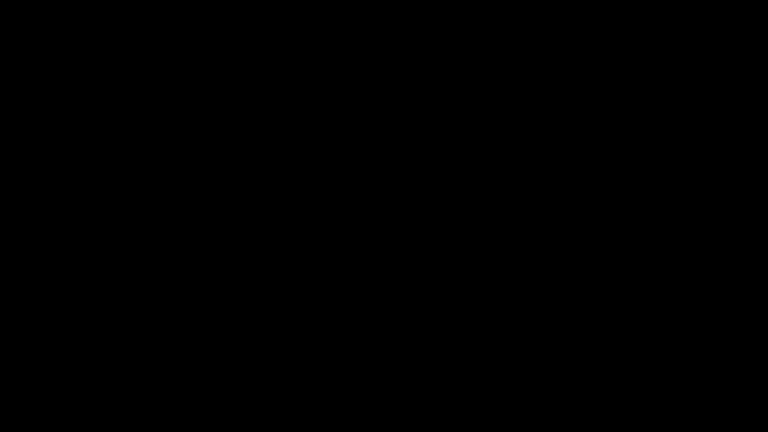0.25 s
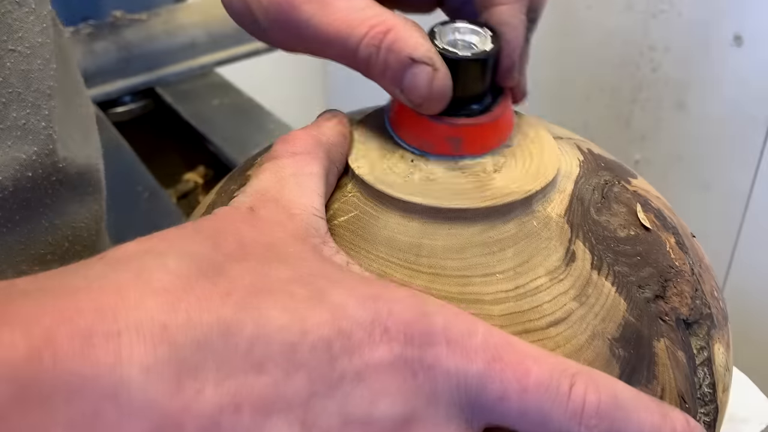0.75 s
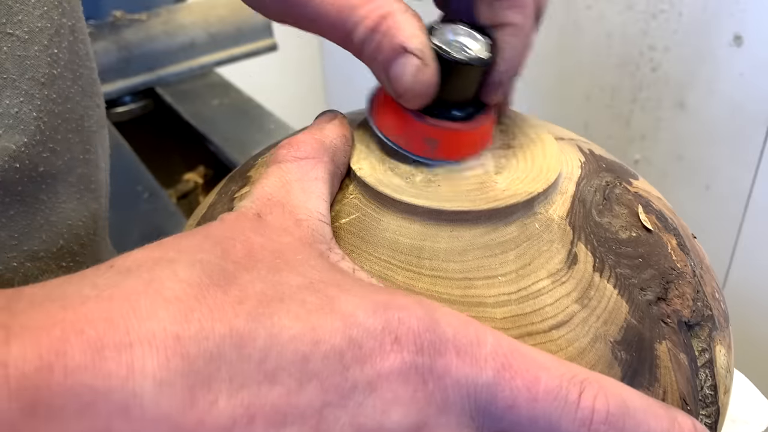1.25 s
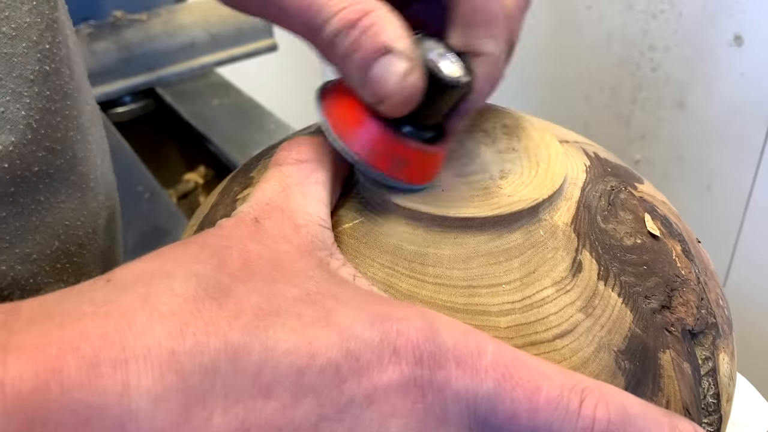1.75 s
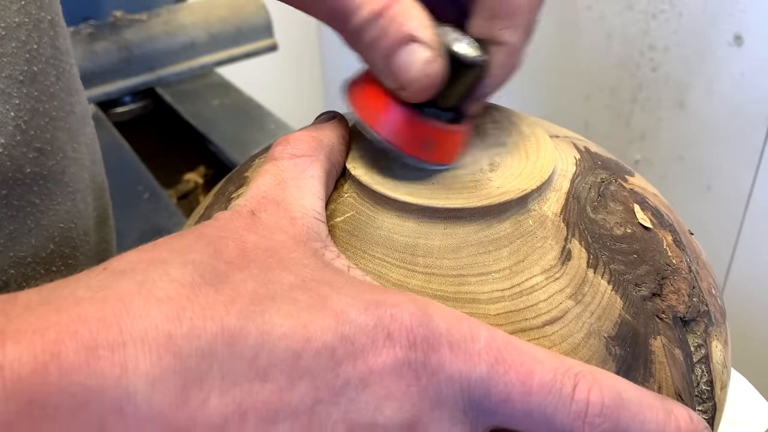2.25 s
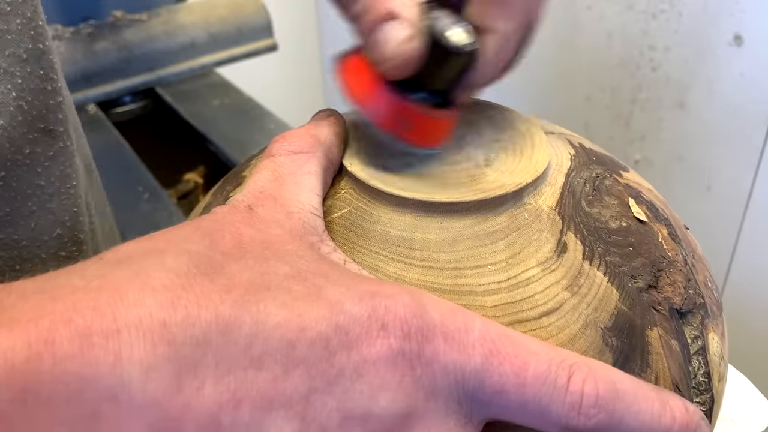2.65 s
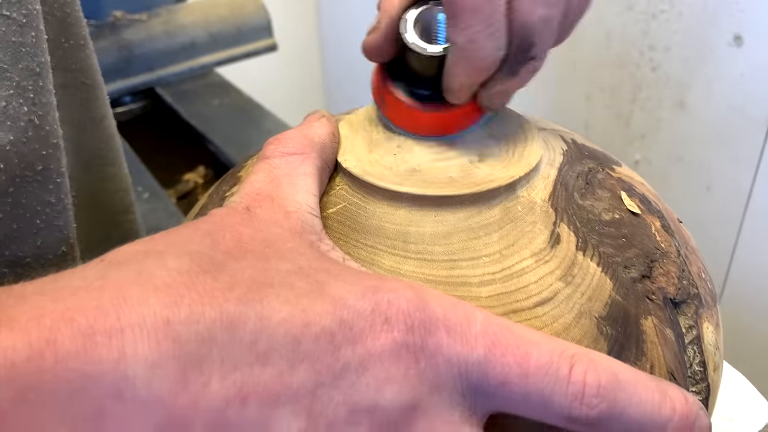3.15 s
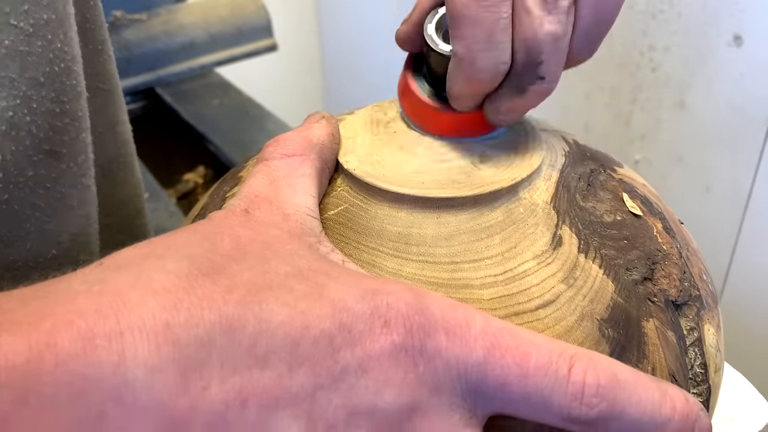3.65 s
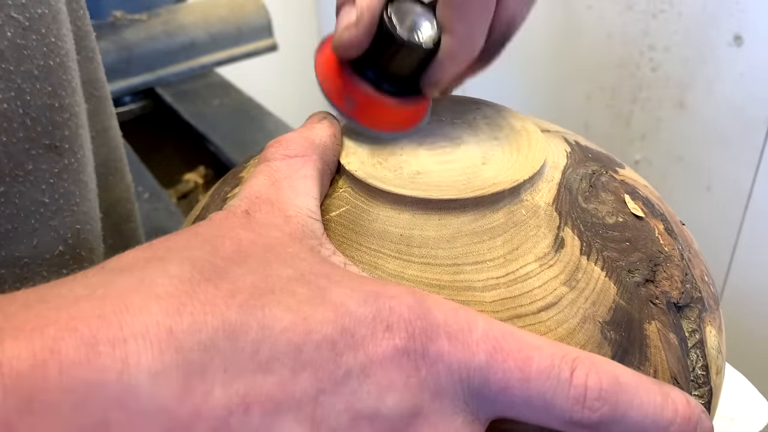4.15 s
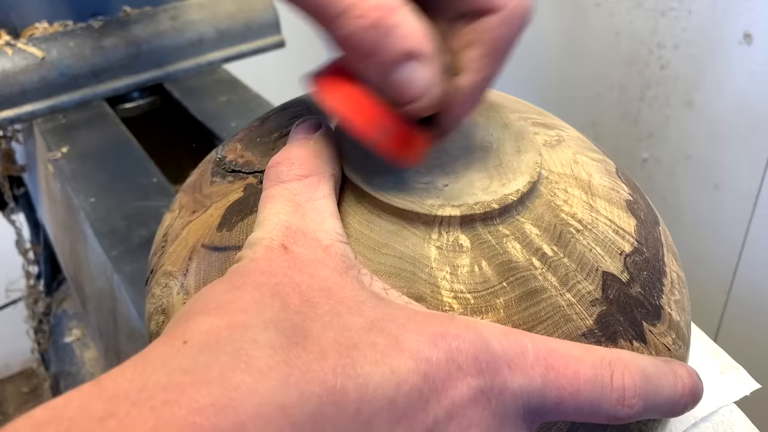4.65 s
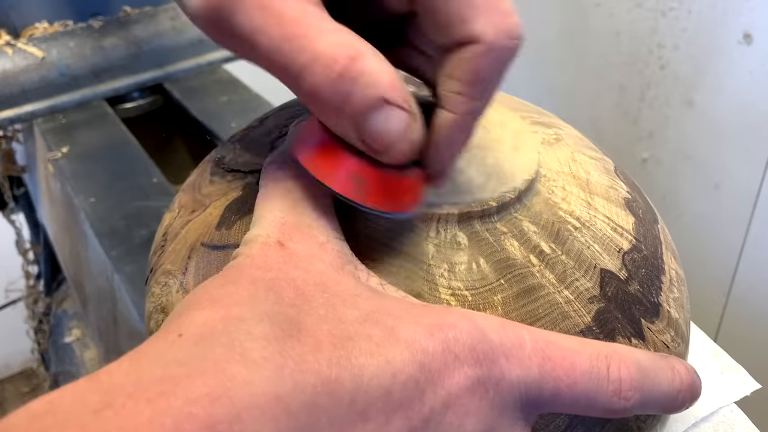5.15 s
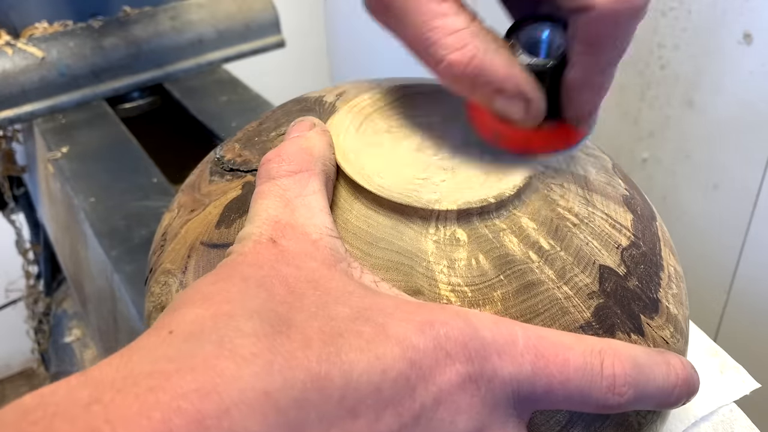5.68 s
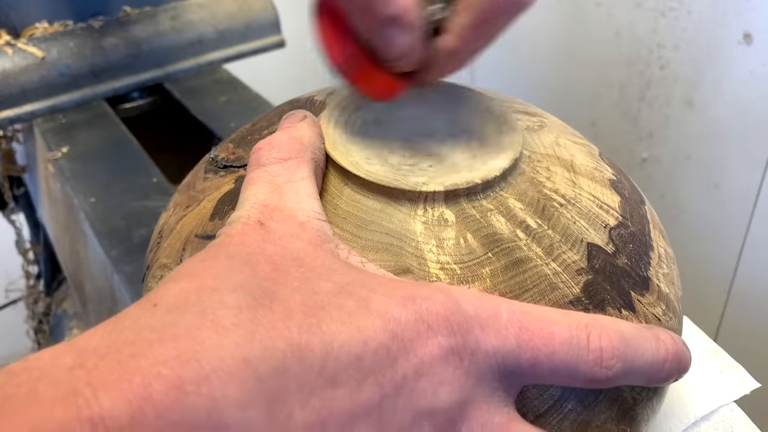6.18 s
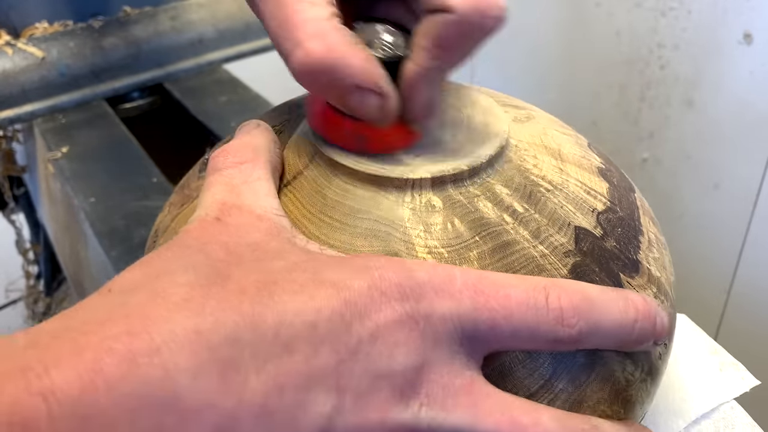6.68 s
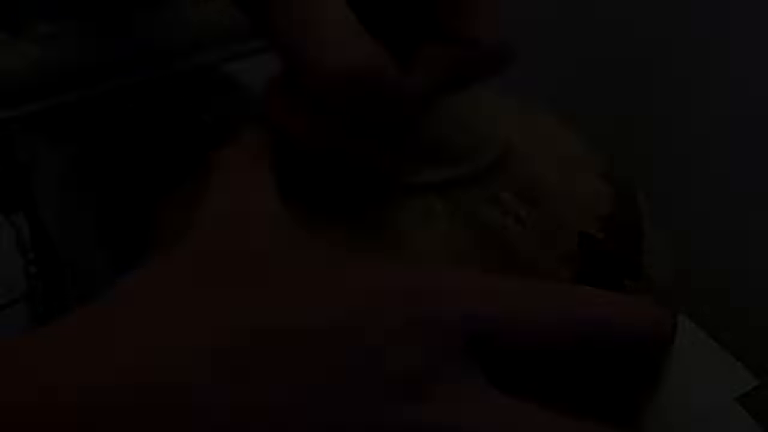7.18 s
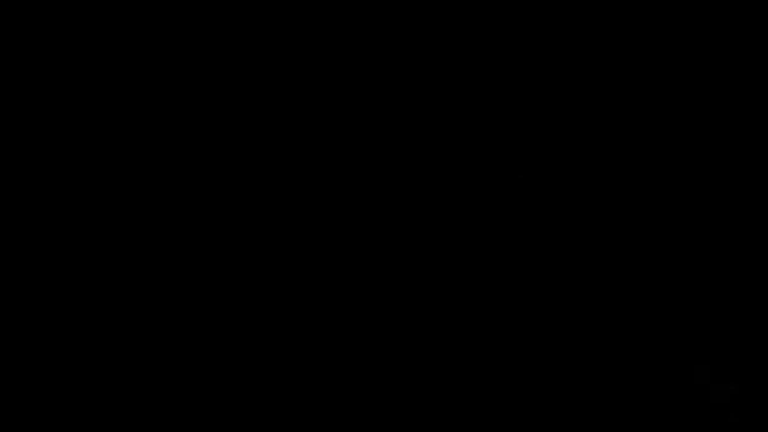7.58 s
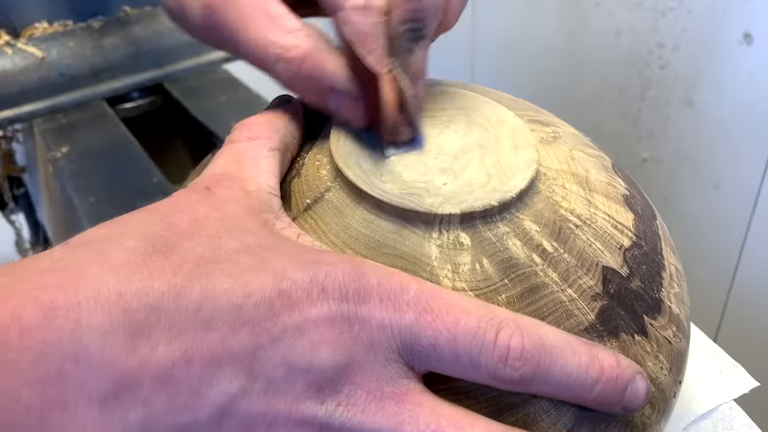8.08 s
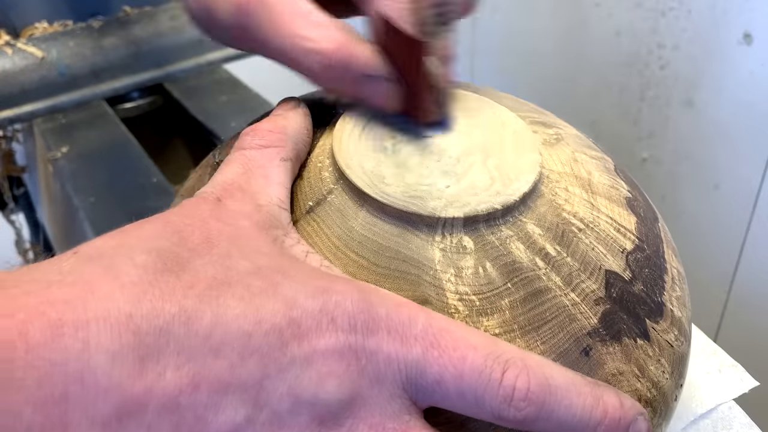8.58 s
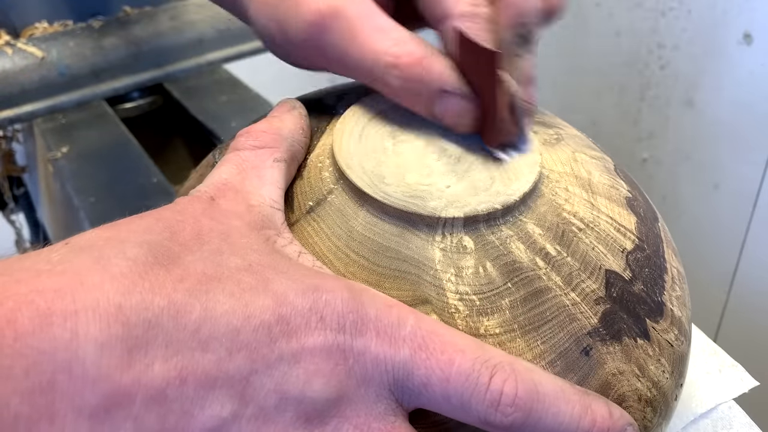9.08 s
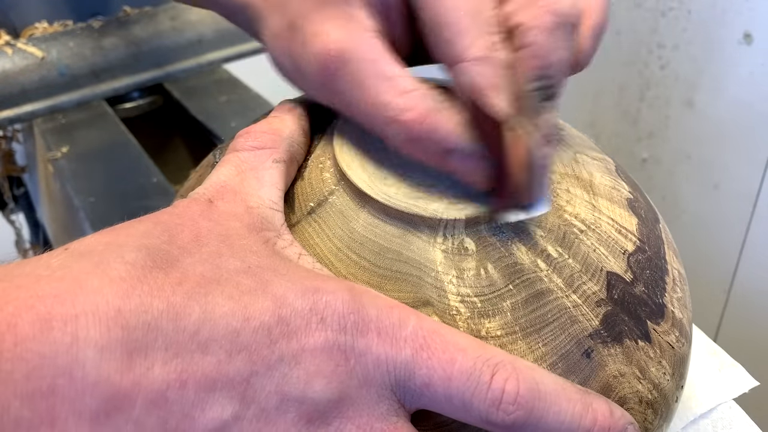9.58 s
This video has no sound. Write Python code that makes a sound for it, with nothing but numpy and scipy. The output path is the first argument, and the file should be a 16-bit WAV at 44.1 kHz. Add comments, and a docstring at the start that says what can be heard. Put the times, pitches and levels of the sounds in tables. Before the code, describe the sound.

Close, dry hand sanding on a wooden bowl: a fading motor whine, rapid gritty pad scrubs with soft thuds, then slower, brighter sheet strokes.

```python
"""A quiet workshop, heard up close: a low rumble, a faint room tone, and a small power sander that whines and fades.
A foam pad with sandpaper scrubs a hollow wooden bowl in short strokes; later a folded sheet rubs it in long ones.
The sander adds sine waves to a rush of noise. Every rub is noise shaped by the grit, pad, sheet or wood.
The other hand turns the bowl with a soft brushing, and the bowl thuds as it rocks on the bench.
Two microphone ports hear it out of step."""
import sys
import numpy as np
from scipy import signal
from scipy.fft import rfft, irfft, next_fast_len
from scipy.io import wavfile
from scipy.ndimage import uniform_filter1d, map_coordinates

SR = 44100
rng = np.random.default_rng(int(sys.argv[2]) if len(sys.argv) > 2 else 0)


def dump(signal):
    """Clip the signal to [-1, 1] and save it as 16-bit WAV at the path in sys.argv[1]."""
    limited = np.clip(np.atleast_2d(signal).T, -1, 1)
    pcm = np.round(limited * 32767).astype(np.int16)
    wavfile.write(sys.argv[1], SR, pcm)


N = 433503
TIME = np.arange(N) / SR  # seconds

# how the two ports differ in the treble, alike for every source: (f/Hz, left leads/half turns, likeness/0-1)
TREBLE = [(7100, 1, .85), (8500, .15, .85), (9200, 0, .99), (10400, -.45, .65), (11100, -1, .999),
          (12000, -1, .999), (12800, -1.5, .6), (13600, -2, .99), (14800, -2, .95), (15800, -3, .9)]


def amp(db):
    """Turn decibels into a plain gain."""
    return np.exp(np.asarray(db) * (np.log(10) / 20))


def unit(x):
    """Scale to an rms of 1."""
    return x / np.sqrt(np.mean(x ** 2) + 1e-20)


def along(points, hz):
    """Read (f/Hz, value) points on a log frequency axis."""
    f, v = np.transpose(points)
    return np.interp(np.log(hz + 1), np.log(f + 1), v)


def over_time(points):
    """Join (t/s, value) points with straight lines, one value per sample."""
    return np.interp(TIME, *np.transpose(points))


def curves(rows):
    """One gain per sample for each dB column; -120 dB outside the table."""
    s, *columns = np.transpose(rows)
    return [amp(np.interp(TIME, s, column, -120, -120)) for column in columns]


def wobble(rate):
    """A smooth random curve with the given number of knots a second."""
    knots = rng.standard_normal(int(N * rate / SR) + 4)
    return map_coordinates(knots, [np.arange(N) * rate / SR])


def filtered(x, response):
    """Multiply the spectrum of x by a response of frequency."""
    m = next_fast_len(N + 8192)
    return irfft(rfft(x, m) * response(np.fft.rfftfreq(m, 1 / SR)), m)[..., :N]


def coloured(spectrum):
    """A response that follows (f/Hz, level/dB) points."""
    return lambda hz: amp(along(spectrum, hz))


def resonant(modes):
    """A body that rings at (f/Hz, width/Hz, level/dB) modes, added with alternating signs."""
    def response(f):
        total = 0
        for k, (centre, width, db) in enumerate(modes):
            peak = 1j * f * width / (centre * centre - f * f + 1j * f * width)
            total = total + (-1) ** k * amp(db) * peak
        return total
    return response


def grainy_noise(response, grain_db, patchy_db):
    """Two independent noise streams of rms 1: their strength flickers and patches of the spectrum swell."""
    grains = rng.standard_normal((2, N)) * amp(grain_db * np.clip(wobble(900), -2, 2))
    z = signal.stft(grains, nperseg=256)[2]
    field = uniform_filter1d(rng.standard_normal(z.shape[1:]), size=5, axis=0)  # smooth over frequency
    field = uniform_filter1d(field, size=9, axis=1)  # smooth over time
    patches = amp(patchy_db * np.clip(unit(field), -3, 1.5))
    return unit(filtered(signal.istft(z * patches, nperseg=256)[1][:, :N], response))


def bent(x, semitones):
    """Play x faster or slower, which moves its resonances."""
    place = np.cumsum(2 ** (semitones / 12)) % (N - 1)
    return np.array([np.interp(place, np.arange(N), row) for row in x])


def workshop():
    """The bench rumbles under the working hands; the room hums faintly."""
    # background levels: (t/s, rumble/dB, room/dB)
    background = [(0, -45, -52), (.35, -81, -64), (1.5, -58, -75), (2, -59.5, -68), (3.3, -64, -68.5),
                  (4.5, -57, -62.5), (6.6, -62, -78.5), (7.9, -57.5, -51), (9.3, -53.5, -59),
                  (9.83, -61, -62)]
    # colour of the rumble: (f/Hz, relative level/dB)
    rumble_colour = [(15, -61), (45, 18.5), (110, 8.5), (200, -1), (400, -46)]
    # colour of the room: (f/Hz, relative level/dB)
    room_colour = [(60, -35), (120, -4.5), (800, -17.5), (1100, -19.5), (5400, -25), (15500, -43)]
    rumble, room = curves(background)
    shake = grainy_noise(coloured(rumble_colour), grain_db=-2.2, patchy_db=-2.0)
    shake = unit(amp(1.55 * wobble(10)) * shake)
    return rumble * shake + room * grainy_noise(coloured(room_colour), grain_db=-0.2, patchy_db=4.0)


def sander():
    """Multiples of the shaft speed with a strong, fluttering eighteenth, over the rush of cooling air."""
    # the motor fades, shaft before a later scaling: (t/s, shaft/dB, air/dB)
    motor = [(0, -39, -35.5), (.09, -47.5, -36), (.25, -42.5, -40.5), (.49, -48, -46), (.69, -58, -56),
             (.735, -69, -75)]
    # the whine swells and sinks as it fades, before a later scaling: (t/s, level/dB)
    whine_levels = [(0.0, -41), (0.044, -47.5), (0.08, -35), (0.112, -35), (0.166, -50), (0.216, -36.5),
                    (0.282, -52.5), (0.31, -44), (0.34, -54), (0.378, -42), (0.44, -52.5), (0.494, -47.5),
                    (0.538, -72), (0.622, -61), (0.72, -78.5)]
    # tones of the shaft: (multiple of the shaft speed, relative level/dB)
    shaft_orders = [(1, 5.5), (2, -12), (4, -8), (5, -11), (8, -10), (13, -18), (15, -10)]
    # colour of the cooling air: (f/Hz, relative level/dB)
    air_colour = [(60, -32), (600, -5.5), (1150, 4.5), (2300, 0.5), (2900, -2), (5500, -2.5), (7500, 1.5),
                  (10000, -2), (15000, -13.5)]
    shaft_hz = 454
    dip_s, dip_width_s, dip_db = 0.13, 0.027, -10  # the shaft tone dips briefly

    (whine,), (shaft, air) = curves(whine_levels), curves(motor)
    turns = 2 * np.pi * np.cumsum(shaft_hz * (1 + 0.00117 * wobble(26.0))) / SR  # angle in radians
    orders = 0
    for k, db in shaft_orders:
        unsteady_db = 1.9 * wobble(24.4) * (k > 1)  # the first order stays steady
        orders = orders + amp(db + unsteady_db) * np.sin(k * turns)
    flutter = amp(2.0 * wobble(54.3))
    shaft = shaft * amp(dip_db * np.exp(-((TIME - dip_s) / dip_width_s) ** 2))
    tones = np.sqrt(2) * (0.5 * shaft * orders + 1.4 * flutter * whine * np.sin(18 * turns))
    rush = grainy_noise(coloured(air_colour), grain_db=0.8, patchy_db=1.8)
    return tones * [[1], [0]] + air * rush  # the tones go in the shared stream only


def turning():
    """The holding hand turns the bowl on the bench: a soft low brushing swells and sinks with each turn."""
    # the turns: (middle t/s, half length/s, level/dB)
    bowl_turns = [(2.52, 0.14, -62), (3.348, 0.2, -62.5), (4.166, 0.063, -60), (4.63, 0.17, -62),
                  (5.254, 0.091, -61.5), (6.032, 0.11, -59.5), (6.677, 0.095, -60.5)]
    # colour of the brushing: (f/Hz, relative level/dB)
    slide_colour = [(150, -21.5), (250, -3), (400, -1), (750, -3), (950, -19), (1500, -40)]
    swell = sum(amp(db) * np.exp(-((TIME - s) / half) ** 4) for s, half, db in bowl_turns)
    brushing = unit(filtered(rng.standard_normal((2, N)), coloured(slide_colour)))
    return swell * amp(0.78 * wobble(25)) * brushing


def thuds():
    """The bowl rocks on the bench: a soft contact of a cycle or two, with no ring."""
    # the knocks: (t/s, level before a 3 dB cut/dB, f/Hz)
    knocks = [(0.837, -42, 139), (1.047, -45.5, 91), (1.135, -46.5, 131), (1.229, -43, 88.5),
              (1.339, -48, 100), (1.425, -51, 120), (1.659, -46, 120), (1.742, -38, 94.5),
              (2.255, -44, 96.0), (3.017, -53, 140), (3.125, -43, 145.4), (3.224, -44, 141),
              (3.32, -47, 119), (3.851, -48, 132.4), (4.042, -44, 111), (4.448, -43, 117),
              (4.566, -42, 142), (4.625, -43, 137), (4.823, -37.5, 124.6), (6.807, -42.5, 119)]
    out, t = np.zeros(N), np.arange(-SR // 25, SR // 25) / SR
    phases = rng.uniform(0, 2 * np.pi, (len(knocks), 1))
    for (s, db, hz), phase in zip(knocks, phases):
        swell = np.exp(-(t * hz / np.where(t < 0, .7, 1.2)) ** 2)  # rises faster than it sinks
        knock = amp(db - 3.0) * swell * np.cos(2 * np.pi * hz * t + phase)
        out[round(s * SR) - SR // 25:][:len(t)] += knock
    return out * [[1], [0]]


def pad_strokes():
    """(fastest t/s, rise/s, fall/s, grit/dB, pad/dB, wood/dB) for every pass of the pad, forward and back."""
    # forward strokes: (start t/s, length/s, grit level/dB)
    forward = [(0.445, 0.04, -56), (0.535, 0.046, -68), (0.596, 0.042, -59), (0.715, 0.046, -59),
               (0.753, 0.064, -56), (0.86, 0.06, -52.5), (0.965, 0.061, -53.5), (1.058, 0.059, -53),
               (1.158, 0.056, -53), (1.254, 0.051, -52), (1.353, 0.057, -50), (1.451, 0.048, -49.5),
               (1.542, 0.048, -47.5), (1.631, 0.058, -46), (1.724, 0.052, -43), (1.804, 0.05, -42.5),
               (1.891, 0.051, -43), (1.984, 0.047, -39), (2.075, 0.048, -39), (2.163, 0.047, -39),
               (2.251, 0.048, -41.5), (2.339, 0.05, -41.5), (2.434, 0.044, -44.5), (2.522, 0.053, -44),
               (2.611, 0.061, -47.5), (2.713, 0.046, -51), (2.813, 0.044, -51), (2.914, 0.044, -49),
               (3.021, 0.039, -48.5), (3.123, 0.048, -52.5), (3.226, 0.051, -53.5), (3.328, 0.045, -48.5),
               (3.423, 0.054, -49.5), (3.534, 0.048, -50), (3.637, 0.046, -51.5), (3.74, 0.041, -48.5),
               (3.838, 0.047, -50), (3.934, 0.047, -49), (4.042, 0.045, -48), (4.139, 0.042, -46),
               (4.217, 0.041, -41), (4.276, 0.066, -42.5), (4.357, 0.044, -41), (4.427, 0.046, -39),
               (4.48, 0.07, -39.5), (4.551, 0.09, -40.5), (4.631, 0.038, -39), (4.699, 0.043, -38),
               (4.822, 0.05, -45), (4.9, 0.043, -40), (4.977, 0.045, -38.5), (5.066, 0.04, -35.5),
               (5.151, 0.04, -34), (5.231, 0.047, -36.5), (5.312, 0.045, -39.5), (5.394, 0.05, -43),
               (5.507, 0.041, -50.5), (5.598, 0.038, -44.5), (5.679, 0.047, -47), (5.766, 0.052, -46.5),
               (5.869, 0.046, -46.5), (5.959, 0.051, -45.5), (6.052, 0.056, -42.5), (6.151, 0.048, -41.5),
               (6.247, 0.04, -41.5), (6.351, 0.066, -45.5), (6.467, 0.059, -44.5), (6.582, 0.061, -44.5),
               (6.691, 0.07, -46.5), (6.803, 0.04, -47.5), (6.903, 0.049, -48), (7.001, 0.052, -43),
               (7.09, 0.055, -44), (7.181, 0.053, -46.0), (7.257, 0.059, -46), (9.52, 0.069, -51),
               (9.576, 0.037, -48), (9.609, 0.04, -47.5), (9.633, 0.045, -53), (9.659, 0.079, -47.5),
               (9.718, 0.058, -46.5), (9.766, 0.071, -45.5)]
    # how the pad sits: (t/s, pad face over the grit/dB, wood level at a usual stroke/dB)
    seat = [(.77, -16, -46), (1, -8, -47), (1.3, -1.5, -46.5), (1.6, -3, -48), (1.8, -1.5, -45.5),
            (2.1, -3.5, -42.5), (2.6, 0, -47.5), (2.85, -2, -45), (3.2, -10, -44), (3.45, -2, -43.5),
            (4.15, -4, -48.5), (4.23, -4.5, -56), (4.45, -0.7, -54.5), (4.9, -1, -52.5),
            (5.15, -8.5, -50.5), (5.399, 1, -54), (5.52, -6.5, -42), (5.65, 4, -51), (5.9, -2.5, -47),
            (6.15, -7.5, -51), (6.45, 1, -48), (6.72, -11.5, -45.5), (6.95, -4, -52), (7.3, -2.5, -52),
            (9.55, -5, -56), (9.8, -5.5, -59.5)]
    # while the pad also presses on the way back: (from t/s, to t/s, share of the gap to the next stroke,
    # then levels over the mean of the two strokes around it: grit/dB, pad/dB, wood/dB)
    returns = [(0.76, 1.25, 0.56, -1, 2, 3), (1.25, 1.7, 0.55, -0.5, 3.5, 2.5),
               (1.7, 1.85, 0.49, -6, 4, -3), (1.95, 2.3, 0.46, -20, -11, -13.5),
               (2.32, 2.38, 0.43, -9, 2.5, -5), (2.4, 4.1, 0.45, -33, -20, -22.5),
               (4.25, 4.6, 0.5, -3.5, 5, 3), (4.6, 4.68, 0.6, -6, -6, -4)]
    bite = 0.4  # share of a stroke spent speeding up
    wood_follows, usual_db = 0.31, -48  # the wood takes this share of the strength above the usual one
    return_rise_s, return_fall_s = 0.015, 0.016

    start, length, grit_db = np.transpose(forward)
    top = start + bite * length
    s, face_db, wood_db = np.transpose(seat)
    pad_db = grit_db + np.interp(top, s, face_db)
    wood_db = np.interp(top, s, wood_db) + wood_follows * (grit_db - usual_db)
    db = np.c_[grit_db, pad_db, wood_db]
    back = []
    for t0, t1, share, *over_db in returns:
        for k in np.flatnonzero((top > t0) & (top < t1)):
            moment = top[k] + share * (top[k + 1] - top[k])
            back.append((moment, return_rise_s, return_fall_s, *((db[k] + db[k + 1]) / 2 + over_db)))
    return [*np.c_[top, bite * length, (1 - bite) * length, db], *back]


def pad_power():
    """Power of grit, pad and wood: strokes swell with hand speed, and the pad catches as it turns round."""
    # the catches: (t/s, level before each part's cut/dB)
    catches = [(2.308, -44), (2.392, -38), (2.4259, -44), (2.812, -44), (2.872, -46), (3.0087, -50),
               (3.113, -54.5), (3.7311, -47), (3.8395, -47), (4.0357, -41), (4.217, -38), (4.366, -37),
               (4.979, -50), (5.5005, -43), (5.597, -40), (5.867, -45), (5.768, -46), (6.25, -39),
               (6.35, -39), (6.469, -30), (6.581, -30.5)]
    power = np.zeros((3, N))
    narrow = np.array([[1.1], [1.01], [.9]])  # the grit needs the most speed, the wood the least
    for s, rise, fall, *levels_db in pad_strokes():
        near = slice(round((s - .1) * SR), round((s + .15) * SR))
        before = TIME[near] < s
        u = narrow * np.abs(TIME[near] - s) / np.where(before, rise, fall)
        shape_db = 0.5 - 13.2 * u ** np.where(before, 2.6, 2.1)
        power[:, near] += amp(np.c_[levels_db] + shape_db) ** 2
    after = np.arange(SR // 30) / SR
    for s, db in catches:
        dying_db = db - np.array([[13], [15], [13]]) - 60 * after / 0.057
        power[:, round(s * SR):][:, :len(after)] += amp(dying_db) ** 2
    return power


def sheet_strokes():
    """Gains of grit, sheet and wood: each long stroke swells over a slower drag, while the sheet touches."""
    # long strokes: (fastest t/s, half length/s, grit/dB, sheet/dB, wood/dB), sheet and wood cut later
    long_strokes = [(7.369, 0.042, -44.5, -49.5, -52), (7.509, 0.055, -39, -47, -54.5),
                    (7.654, 0.058, -33.5, -38, -53), (7.79, 0.053, -37, -43.5, -49.5),
                    (7.912, 0.031, -30.5, -31, -49.5), (8.049, 0.088, -35, -43.5, -46.5),
                    (8.197, 0.034, -30, -36, -50), (8.32, 0.052, -32, -44, -46),
                    (8.465, 0.037, -30, -39, -46), (8.579, 0.031, -29, -36.5, -45),
                    (8.662, 0.029, -35, -32.5, -50), (8.75, 0.032, -30.5, -37, -44.5),
                    (8.844, 0.045, -32, -42.5, -49), (8.925, 0.014, -34.5, -30, -51),
                    (9.01, 0.04, -32, -36, -46), (9.122, 0.036, -34, -40.5, -47),
                    (9.242, 0.078, -37.5, -41, -49.5), (9.338, 0.043, -38, -51, -47.5),
                    (9.468, 0.06, -41.5, -48, -49.5)]
    drag_s, drag_db = 0.052, [[-9], [-9], [-7.5]]  # the slower skirt, for grit, sheet and wood
    land_s, lift_s = 7.35, 9.53  # the sheet comes on and off the wood
    on = TIME[TIME > land_s]

    def bell(s, width):
        return np.exp(-((on - s) / width) ** 2)

    power = 0
    for s, half, *db in long_strokes:
        power = power + amp(np.c_[db]) ** 2 * (bell(s, half) + amp(drag_db) ** 2 * bell(s, drag_s))
    touch = np.clip(np.minimum((on - land_s) / 0.0079, (lift_s - on) / 0.034), 0, 1)
    return np.pad(np.sqrt(power) * touch, [(0, 0), (N - len(on), 0)])


def grit_hiss(sharp_db):
    """Grains tear the fibres with a steady hiss; the sharpest ones fizz higher up."""
    # colour of the hiss: (f/Hz, relative level/dB)
    grit_colour = [(2500, -32.5), (5500, -8.5), (7500, 2), (9500, 1), (12000, -4), (16000, -21)]
    # colour of the sharpest grains: (f/Hz, relative level/dB)
    fizz_colour = [(8000, -48), (11000, -10), (13000, 5), (15000, -0.5), (16000, -25)]
    fizz = amp(sharp_db - 11.5) * grainy_noise(coloured(fizz_colour), grain_db=1.5, patchy_db=3.5)
    return grainy_noise(coloured(grit_colour), grain_db=1.0, patchy_db=3.0) + fizz


def pad_scrape():
    """The foam pad's face resonates; pressing the foam shifts its pitch."""
    # the pad's resonances: (f/Hz, width/Hz, relative level/dB)
    pad_modes = [(2980, 950, -3.5), (4290, 1370, 1), (5420, 1800, 1), (6660, 620, 3.5)]
    # pressing the foam: (t/s, pitch shift/semitones)
    squeeze = [(5.4, 0.0088), (5.7, -1.93), (5.9, -1.95), (6.1, -0.039)]
    return bent(grainy_noise(resonant(pad_modes), grain_db=1.5, patchy_db=3.5), over_time(squeeze))


def sheet_scrape():
    """The folded sheet flexes: its upper modes move in pitch and its lowest changes in level."""
    # the sheet's resonances: (f/Hz, width/Hz, relative level/dB)
    paper_modes = [(3927, 420, 2), (4686, 800, 2.5), (6700, 1400, -4.5)]
    # the flexing: (t/s, pitch shift/semitones)
    fold = [(7.4, 0.5), (8.5, -1), (8.65, 3.5), (8.8, 1), (8.92, 3.5), (9.1, 2), (9.5, 0)]
    flex = over_time(fold)
    crease = grainy_noise(resonant(paper_modes[:1]), grain_db=0.5, patchy_db=4.5)
    face = grainy_noise(resonant(paper_modes[1:]), grain_db=0.5, patchy_db=4.5)
    crease_db_per_semitone = -2  # flexing upwards mutes the lowest mode instead of raising it
    return amp(crease_db_per_semitone * flex - 3.5) * crease + amp(-3.5) * bent(face, flex)


def bowl_wood(pitch, thin):
    """The rubbed wood answers: a blend of the bowl's thin wall and its thick foot."""
    # thin wall: (f/Hz before the pitch shift, width/Hz, relative level/dB)
    wall_modes = [(534, 310, -4.5), (1020, 410, -0.5), (1400, 530, 0)]
    # thick foot: (f/Hz before the pitch shift, width/Hz, relative level/dB)
    foot_modes = [(1855, 820, -5.5), (2084, 556, 0), (2790, 640, 1.5), (3710, 1430, -3)]
    # both roll off gently towards the treble
    wall = grainy_noise(lambda f: resonant(wall_modes)(f) / (1 + 1j * f / 2500), grain_db=2.5, patchy_db=2.4)
    foot = grainy_noise(lambda f: resonant(foot_modes)(f) / (1 + 1j * f / 4000), grain_db=1.8, patchy_db=2.8)
    return np.sin(thin) * bent(wall, pitch) + np.cos(thin) * bent(foot, pitch)


def bowl_hum():
    """Rubbing sets the hollow of the bowl humming low."""
    # bowl on its bench: (f/Hz, width/Hz, relative level/dB)
    hollow_modes = [(139.4, 25.4, -5), (178.5, 23, -3), (217, 19.6, -6.5), (271.5, 14.3, 2),
                    (348.3, 21, -7.5)]
    # strength of the humming: (t/s, level/dB)
    hum_levels = [(1.8, -86), (2.4, -67), (3.6, -73), (4.6, -62.5), (5.2, -75.5), (7.2, -69), (7.7, -54.5),
                  (7.9, -48), (8.43, -49.5), (8.68, -53), (9.35, -47.5), (9.55, -59.5), (9.83, -68)]
    # the two deepest modes over the others: (t/s, level/dB)
    deep_levels = [(7.3, 5), (7.7, -7.5), (8.4, -4.5), (8.9, 0)]

    def voice(modes):
        return grainy_noise(lambda f: resonant(modes)(f) / (1 + 1j * f / 400), grain_db=0.6, patchy_db=2.5)

    deep, high = voice(hollow_modes[:2]), voice(hollow_modes[2:])
    hum = curves(hum_levels)[0] * amp(0.77 * wobble(8.3))
    return hum * (high + amp(over_time(deep_levels)) * deep)


def edge_rasp():
    """The sheet's edge rasps on the foot; squaring the response narrows its peaks."""
    # the rasp's resonances, before squaring: (f/Hz, width/Hz, relative level/dB)
    rasp_modes = [(536, 160, -4.5), (1580, 610, 0)]
    return grainy_noise(lambda f: resonant(rasp_modes)(f) ** 2, grain_db=1.5, patchy_db=3.0)


def hand_shove():
    """The leaning hand gives a low push: noise kept between about 40 and 220 Hz."""
    return grainy_noise(lambda f: 1j * f / (40 + 1j * f) / (1 + 1j * f / 220) ** 2, grain_db=3.5, patchy_db=3.0)


def sanding():
    """The strokes drive the grit, pad, sheet and wood, each with its own sound."""
    # the contact: (t/s, nearness to the thin wall/0-1, sharpness of the grit before a cut/dB,
    # pitch of the wood/semitones)
    contact = [(.7, 0.38, 4, 0), (1.5, 0.22, -6, -1), (2.001, 0.04, -15.5, 0), (2.3, 0.06, -22, -0.28),
               (2.75, 0.27, -1, -.5), (3.05, 0.52, -13, -1), (3.25, 0.36, -12, 1), (3.551, 0.29, -12, -1),
               (3.899, 0.34, -19, -2), (4.2, 0.1, -5, -2), (4.5, 0.16, 0, -2), (5.001, 0.15, -2, -2),
               (5.401, 0.16, -2, -1), (5.6, 0.22, 1, 1), (6.201, 0.17, -2, 2), (6.8, 0.23, 1, 2),
               (7.3, 0.07, -1.5, 1), (7.7, 0.18, -1, -3), (8.6, 0.06, 0.5, -3), (9.83, 0.34, 1, -3)]
    long_grit, paper, long_wood = sheet_strokes()
    long_gains = np.array([long_grit, np.zeros(N), long_wood])
    grit, pad, wood = np.sqrt(pad_power() + long_gains ** 2)
    s, near_wall, sharp_db, semitones = np.transpose(contact)
    pitch = np.interp(TIME, s, semitones) + 0.8 * wobble(8)  # the wood's pitch strays, in semitones
    thin = np.pi / 2 * np.clip(np.interp(TIME, s, near_wall), 0, 1)
    # the hand leans on the bowl 7.8 ms before the pad slides
    lean = amp(-4) * np.sin(thin) * np.roll(wood, -round(0.0078 * SR))
    return (grit * grit_hiss(np.interp(TIME, s, sharp_db))
            + pad * pad_scrape()
            + paper * sheet_scrape()
            + wood * bowl_wood(pitch, thin)
            + amp(-8.5) * long_wood * edge_rasp()
            + lean * hand_shove()
            + bowl_hum())


def walls(x):
    """The room's answer: a noise tail in which each frequency dies at its own speed."""
    # how long the echo takes to fall by 60 dB: (f/Hz, time/s)
    decay = [(200, 0.15), (10000, 0.095)]
    hz, t, z = signal.stft(rng.standard_normal((2, SR // 3)), SR, nperseg=256)
    fading = amp(-60 * t / along(decay, hz)[:, None])
    tail = signal.istft(z * fading, SR, nperseg=256)[1]
    return signal.fftconvolve(x, tail / np.linalg.norm(tail[0]), axes=1)[:, :N]


def ports(pair, table):
    """Shared and unshared streams reach two ports, with a lead and a shadow that change with pitch."""
    # left over right: (f/Hz, level/dB)
    shadow = [(800, 0), (2500, -1), (4200, -4.5), (5800, -4), (7000, 0.5)]
    m = next_fast_len(N + 8192)
    shared, unshared = rfft(pair, m)
    hz = np.fft.rfftfreq(m, 1 / SR)
    f, lead, alike = np.transpose(table)
    u = np.arccos(np.interp(hz, f, alike)) / 2  # mixing angle that gives this likeness
    # each port takes half of the level difference and half of the lead
    half = amp(along(shadow, hz) / 2) * np.exp(.5j * np.pi * np.interp(hz, f, lead))
    left = (np.cos(u) * shared + np.sin(u) * unshared) * half
    right = (np.cos(u) * shared - np.sin(u) * unshared) / half
    return irfft([left, right], m)[:, :N]


def scene():
    """Add the room's answer to the hand work, then place everything at the two ports."""
    # bowl and workshop at the ports: (f/Hz, left leads/half turns, likeness/0-1)
    bowl_ports = [(170, -.05, .97), (480, .08, .82), (800, .35, .5), (1200, .25, .75), (1550, .35, .55),
                  (2100, .45, .6), (3200, 1, .9), (3900, .8, .65), (4700, 1.9, .35), (5600, 1.3, .55),
                  *TREBLE]
    # sander at the ports: (f/Hz, left leads/half turns, likeness/0-1)
    sander_ports = [(170, -.1, .9), (450, -.3, .97), (690, 0, .3), (950, .8, .45), (1300, 0, .05),
                    (1800, -.45, .35), (5500, 1.3, .15), *TREBLE]
    work = sanding() + turning()
    near = work + amp(-11.5) * walls(work) + thuds() + workshop()
    return ports(near, bowl_ports) + ports(sander(), sander_ports)


def record(dry):
    """Keep nothing above the band limit of 15805 Hz."""
    return filtered(dry, lambda hz: hz < 15805)


dry = scene()
out = record(dry)
dump(out)
```